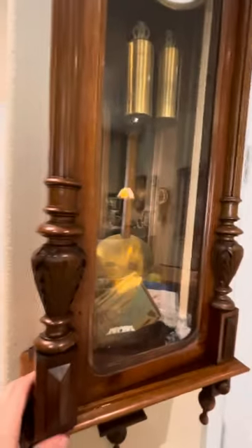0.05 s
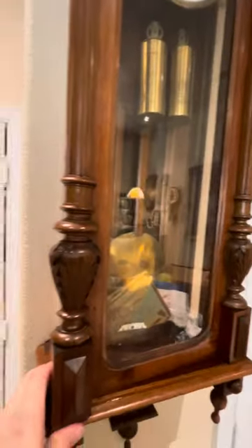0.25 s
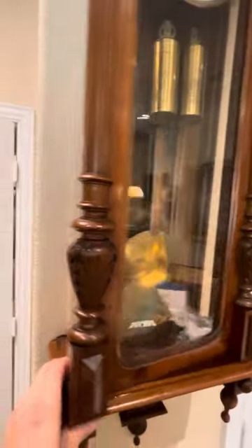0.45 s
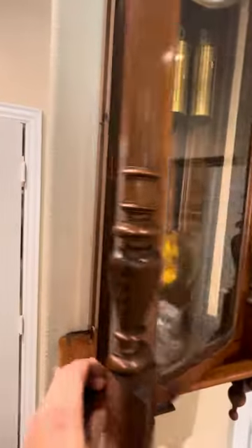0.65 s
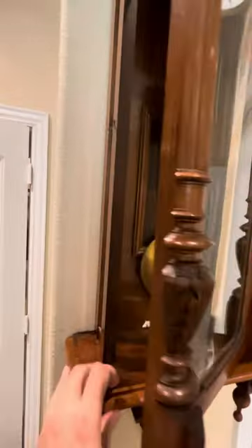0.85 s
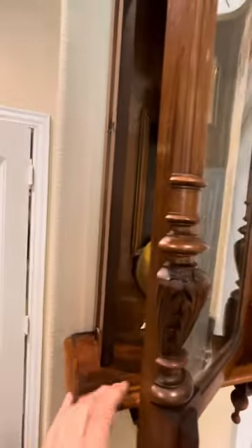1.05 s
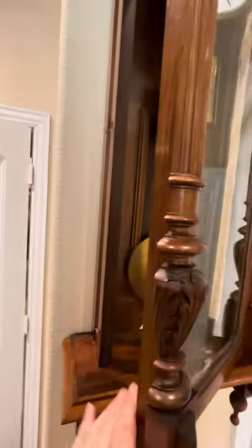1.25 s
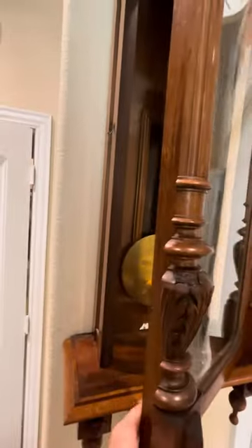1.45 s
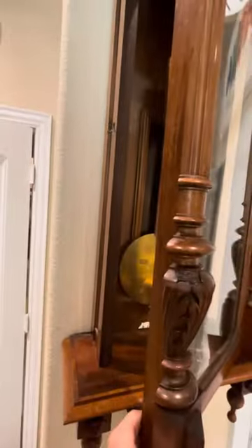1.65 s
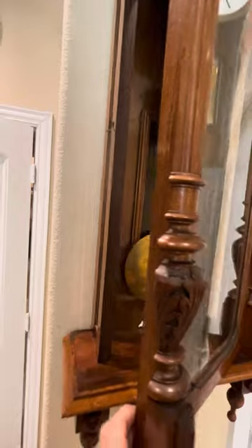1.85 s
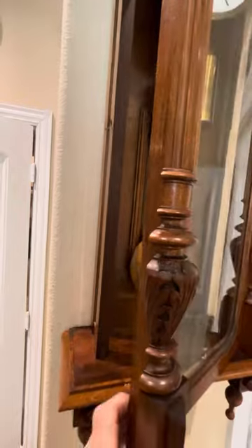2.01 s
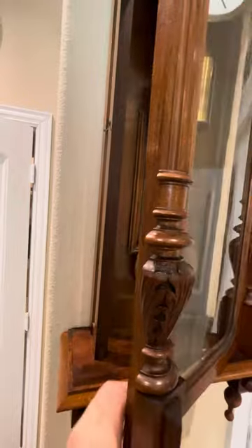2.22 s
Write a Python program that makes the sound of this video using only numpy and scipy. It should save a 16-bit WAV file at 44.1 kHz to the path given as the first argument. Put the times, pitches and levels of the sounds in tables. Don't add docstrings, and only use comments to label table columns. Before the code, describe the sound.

A wooden clock door being unlatched, heard close in stereo in a small quiet room. Faint tick near 0.1 s, a crisp latch click at 0.23, then the loudest, bright cracking snap at 0.41 with hollow wood knocks and skin rubbing until 0.7. A lull with faint ticks; lighter snap at 1.13, strong snap at 1.39, soft knock at 1.67, clustered low knocks around 1.9-2.0, light snap at 2.24.

```python
import sys
import numpy as np
from scipy import signal
from scipy.fft import rfft, irfft, next_fast_len
from scipy.io import wavfile
from scipy.ndimage import uniform_filter1d

SR = 44100
rng = np.random.default_rng(int(sys.argv[2]) if len(sys.argv) > 2 else 0)


def volts(x):
    e = np.asarray(x, float) / 20
    return 10 ** e


def master_out(mix):
    frames = np.transpose(np.atleast_2d(mix))
    ceiling = np.clip(frames, -1, 1)
    pcm = np.round(ceiling * 32767).astype(np.int16)
    wavfile.write(sys.argv[1], SR, pcm)


N = 99225

# frequency in Hz, level in dB.
AIR_COLOUR = [(25, 7), (90, 5.5), (250, -21), (600, -29.5), (2000, -26), (5300, -31), (11000, -36.5),
              (14000, -55.5)]
AIR_DB = -61.5

# frequency in Hz, t60 in seconds.
ROOM_T60 = [(150, 0.39), (1000, 0.3), (5000, 0.37), (12000, 0.29)]
# frequency in Hz, level in dB.
ROOM_COLOUR = [(150, 4), (1000, 9.5), (3000, 0), (6000, 3), (12000, -7.5)]
ROOM_GAP_S = 0.00043
ROOM_SNAP_DB, ROOM_TICK_DB, ROOM_KNOCK_DB, ROOM_RUB_DB = -4.5, -12, -10, -8
# frequency in Hz, correlation from 0 to 1.
LIKENESS = [(60, 1), (300, 0.26), (800, 0.54), (4000, 0.033), (6000, 0.15), (8000, 0.34), (12000, 1)]

# start in seconds, length in seconds, level in dB,
# tilt in dB per octave, fade in dB per second.
RUBS = [(0, 0.071, -71, 1.5, 54), (0.205, 0.078, -72, -2, -100), (0.376, 0.14, -49.5, 0, -4),
        (0.504, 0.17, -50.5, -4, 5), (0.694, 0.097, -54.5, -3.5, -7), (0.779, 0.061, -51.5, -4.5, 17),
        (0.095, 0.07, -80, -4.5, -3), (0.99, 0.081, -64, 0.5, 28), (1.083, 0.055, -68.5, -7, -11),
        (1.298, 0.085, -64, -2.5, -32), (1.577, 0.088, -61, 2.5, 47), (1.834, 0.11, -62, 1, -43.5),
        (1.912, 0.041, -41.5, -2, -9), (1.968, 0.16, -54.5, -5.5, 42), (2.154, 0.083, -67.5, -8, 41),
        (2.194, 0.047, -73.5, 3.5, -3)]
# frequency in Hz, density in dB per Hz.
RUB_COLOUR = [(300, -5), (800, 1.5), (1500, 2), (2800, 0), (5500, -0.26), (7500, -1), (11000, 3),
              (13500, -25)]
RUB_RISE_S, RUB_FALL_S, RUB_GRAINS_PER_S = 0.0027, 0.0033, 6000

# frequency in Hz, level in dB, t60 in seconds.
CASE_MODES = [(69.44, -15.5, 0.28), (102, -7.5, 0.13), (140, -1, 0.09), (197.4, -4.5, .08),
              (231, -2.5, 0.084), (290, 0, 0.049), (390.6, -5.5, 0.056), (754, -2.5, 0.039),
              (880, 9, 0.019), (1104, -11, 0.083), (1446, 0.5, 0.026), (2700, -15.5, 0.11)]
# time in seconds, level in dB.
SHUDDER = [(0.0, -110), (0.31, -44), (0.38, -55.5), (0.41, -33), (1.06, -62.5), (1.16, -40), (1.37, -79),
           (1.4, -41), (1.62, -105), (1.67, -56), (1.87, -65.5), (1.92, -32.5), (2.13, -57), (2.25, -53)]
SHUDDER_PER_S, SHUDDER_DB, SHUDDER_SOFT_HZ = 130, -8, 358

# time in seconds, peak in dB, favoured pitch in Hz, ring share of t60.
KNOCKS = [(0.23, -45, 282, 3.9), (.25, -40.5, 90, 1.3), (0.312, -43, 78.7, 1.1), (.409, -24, 290, 2.1),
          (0.441, -51, 111, 2.8), (.49, -27.5, 171, 1.3), (0.591, -29.5, 202, 1.3),
          (0.629, -33.5, 166.6, 1.6), (1.091, -57.5, 383, 0.92), (1.127, -59, 190, 1.2),
          (1.392, -38, 880, 1.1), (1.667, -36, 200, 0.43), (1.899, -39, 400, 1.9), (1.941, -37, 2700, 0.5),
          (.425, -37, 390, 0.76), (.27, -45.5, 400, 1.7), (.65, -40, 232, 0.58), (1.974, -29, 140, 0.75),
          (1.15, -40, 880, 1.4), (1.01, -48.5, 188, 1.5), (1.913, -22, 276, 0.42), (1.927, -21.5, 221, 0.4),
          (1.961, -27.5, 140, 0.51), (2.178, -40, 220, 0.46), (2.24, -38.5, 154, 0.95)]
KNOCK_FALL_DB = 16.5
CONTACT_CYCLES = 0.46

# time in seconds, peak in dB.
TICKS = [(.0775, -50), (.7126, -48), (1.3424, -41.5), (1.897, -37), (2.164, -40.5), (1.1148, -41.5),
         (1.278, -47), (1.5958, -40.5), (1.377, -63.5), (1.384, -39), (1.3915, -17.5), (1.911, -31),
         (1.9295, -23.5), (.787, -41), (.8225, -56.5), (.9966, -73), (.2263, -24.5), (0.42, -44.5),
         (1.1287, -32), (1.393, -27.5), (1.9495, -38)]
TICK_KINDS = [0, 0, 1, 2, 2, 3, 3, 3, 4, 4, 4, 5, 5, 5, 3, 1, 6, 6, 4, 7, 3]
# frequency in Hz, level in dB, t60 in seconds.
TICK_MODES = [
    [(1720, -3, 0.025), (1960, 0, .02), (2960, -4, .025), (5400, -8, 0.015)],
    [(1340, -2, 0.045), (2660, 0, 0.045), (3780, -12, 0.04), (5440, -5, 0.05)],
    [(800, -5, 0.02), (1300, 0, 0.02), (1800, -6, 0.015), (3200, -14, 0.02)],
    [(2300, -2, .005), (3500, 0, .005), (4800, -1, .004), (6500, -8, .004)],
    [(780, -8, .02), (2200, -4, .015), (3200, -2, .015), (5430, 0, .025)],
    [(720, -3, .03), (1450, -1, .035), (2750, 0, .035), (3500, -8, .025)],
    [(1700, 0, .01), (2900, -8, .008), (4050, 0, .007), (5800, -8, .006)],
    [(690, -2, .03), (820, -5, .02), (1080, 0, .03), (2100, -3, .02)],
]
TICK_SCRAPE_S = [.06, 0.045, 0.016, 0.00313, 0.024, 0.023, 0.007, .015]
TICK_HIT_DB = [17, 13.6, 10, 8.3, 13, 7.4, 7.7, 10.3]

# time in seconds, peak in dB, tilt in dB per octave,
# crack t60 in seconds, wood share in dB.
SNAPS = [(0.2272, -15, 3.5, 0.013, -20), (0.3789, -35.5, -6, 0.005, -22), (0.4077, 0.5, 5, 0.014, -20.5),
         (0.6385, -34.5, 6.5, 0.026, -10), (1.11, -54, 17, 0.011, -22), (1.1293, -19.5, 0.5, 0.01, -15),
         (1.298, -50, 3, 0.014, -13), (1.3915, -10.5, 2.5, 0.033, -18), (1.584, -45, 7.5, 0.012, -20.5),
         (1.9125, -41, 2, 0.01, 3), (2.2434, -36, 1.5, 0.028, -14)]
# frequency in Hz, density in dB per Hz.
SNAP_COLOUR = [(500, -24), (1500, 8.5), (2500, 7), (4000, -2), (5800, 1.1), (8500, -2), (11000, 6.5),
               (14500, -14.5)]

RIPPLE_S, RIPPLE_DB, RIPPLE_LOW_HZ, RIPPLE_HZ = .0006, -5.5, 250, 4500

# frequency in Hz, lag of the right in radians.
PORT_PHASE = [(200, 0), (400, .6), (700, 3.3), (3000, 3.3), (3900, 6.3), (5500, 6.1), (8000, 9),
              (9800, 9.6), (11800, 12.57)]
BALANCE_DB = .2
ALIKE_ABOVE_HZ = 8000
MIC_LOW_HZ, CUTOFF_HZ = 49, 10840
TOP = .85


def in_time(rows):
    return np.interp(np.arange(N) / SR, *np.transpose(rows))


def at_hz(points, hz):
    freqs, values = np.transpose(points)
    return np.interp(np.log(hz), np.log(freqs), values)


def rms_one(x):
    return x / np.sqrt(np.mean(x ** 2) + 1e-20)


def low(x, hz):
    return signal.sosfilt(signal.butter(2, min(hz, 19000), fs=SR, output="sos"), x)


def ring(x, hz, t60):
    r = volts(-60 / (max(t60, 1e-3) * SR))
    w = 2 * np.pi * hz / SR
    return signal.lfilter([0, np.sin(w)], [1, -2 * r * np.cos(w), r * r], x + 1e-18)


def add(out, s, x):
    i = int(s * SR)
    out[i:i + len(x)] += x[:len(out) - i]


def drift(rate):
    knots = rng.standard_normal(int(N / SR * rate) + 3)
    path = np.interp(np.arange(N) / SR * rate, np.arange(len(knots)), knots)
    return low(path, 2 * rate) * 3.53


def grains(per_s, spread_db, shape):
    sizes = volts(spread_db * np.minimum(rng.exponential(1, shape), 4))
    sizes = sizes * rng.choice([-1, 1], shape)
    return sizes * (rng.random(shape) < per_s / SR)


def bands(white, gain):
    out = 0
    edges = 25 * 2 ** np.arange(0, 9.6, .5)
    for k, (a, b) in enumerate(zip(edges, edges[1:])):
        band_pass = signal.butter(2, [a, b], "band", fs=SR, output="sos")
        mid, side = signal.sosfilt(band_pass, white[k % 2])
        hz = np.sqrt(a * b)
        alike = np.clip(at_hz(LIKENESS, hz), -1, 1)
        pair = np.sqrt(1 + alike) * mid + np.sqrt(1 - alike) * side * [[1], [-1]]
        out = out + gain(hz) * pair
    return out


def air():
    def gain(hz):
        return volts(at_hz(AIR_COLOUR, hz) + 0.93 * drift(13.0))
    return volts(AIR_DB) * rms_one(bands(rng.standard_normal((2, 2, N)), gain))


def room(x):
    t = np.arange(SR // 2 * 2) / SR

    def gain(hz):
        return volts(at_hz(ROOM_COLOUR, hz) - 60 * t / at_hz(ROOM_T60, hz))
    tail = bands(rng.standard_normal((2, 2, len(t))), gain)
    energy = np.sum(tail ** 2, axis=1, keepdims=True)
    tail = tail * np.clip(t / ROOM_GAP_S - .5, 0, 1) / np.sqrt(energy)
    return signal.fftconvolve(x[None], tail, axes=1)[:, :N]


def rub():
    t = np.arange(N) / SR
    together = drift(25)
    strokes = []
    for s, length, db, _, fade_db in RUBS:
        level = volts(db - fade_db * np.clip(t - s, 0, length))
        rise = np.clip((t - s) / RUB_RISE_S, 0, 1)
        fall = np.exp(-np.maximum(t - s - length, 0) / RUB_FALL_S)
        strokes.append(level * rise * fall)
    tilts = np.array(RUBS)[:, 3]

    def gain(hz):
        patchy = volts(at_hz(RUB_COLOUR, hz) + 0.5 * together + 0.91 * drift(60))
        return patchy * (volts(tilts * np.log2(hz / 3000)) @ strokes)
    return bands(rms_one(grains(RUB_GRAINS_PER_S, 5.06, (2, 2, N))), gain)


def shudder():
    jolts = low(grains(SHUDDER_PER_S, 2.8, N), SHUDDER_SOFT_HZ)
    x = sum((-1) ** k * volts(level_db) * ring(jolts, hz, 0.73 * t60)
            for k, (hz, level_db, t60) in enumerate(CASE_MODES))
    return volts(in_time(SHUDDER) + SHUDDER_DB) * rms_one(x)


def knocks():
    out = np.zeros(N)
    luck = rng.normal(0, 1, (len(KNOCKS), 2, len(CASE_MODES)))
    for (s, db, top_hz, share), (own, sign) in zip(KNOCKS, luck):
        push = np.pad(np.hanning(int(CONTACT_CYCLES * SR / top_hz)), (0, 20000))
        x = 0
        for (hz, level_db, t60), o, p in zip(CASE_MODES, own, sign):
            mode_db = level_db + 3.9 * o - KNOCK_FALL_DB * abs(np.log2(hz / top_hz))
            x = x + np.sign(p) * volts(mode_db) * ring(push, hz, share * t60)
        add(out, s - .001, volts(db) * x / np.abs(x).max())
    return out


def ticks():
    out, t = np.zeros(N), np.arange(8000) / SR
    noise = rng.standard_normal((len(TICKS), len(t)))
    for (s, db), kind, n in zip(TICKS, TICK_KINDS, noise):
        slide = n * volts(-60 * t / max(TICK_SCRAPE_S[kind], .001))
        force = slide + volts(TICK_HIT_DB[kind]) * (t == 0)
        x = sum((-1) ** k * volts(level_db) * ring(force, hz, t60)
                for k, (hz, level_db, t60) in enumerate(TICK_MODES[kind]))
        add(out, s, volts(db) * x / np.abs(x).max())
    return out


def snaps():
    out, t = np.zeros(N), np.arange(4096) / SR
    hz = np.fft.rfftfreq(len(t), 1 / SR) + 1
    noise = rng.standard_normal((len(SNAPS), len(t)))
    for (s, db, tilt_db, t60, wood_db), n in zip(SNAPS, noise):
        force = n * (np.clip((t - .002) / 0.0011, 0, 1) * volts(-60 * t / max(t60, .002)))
        burst = rfft(force)
        burst = burst / uniform_filter1d(np.abs(burst), size=25)
        colour_db = at_hz(SNAP_COLOUR, hz) + tilt_db * np.log2(np.maximum(hz, 400) / 5000)
        crack = irfft(burst * volts(colour_db))
        crack = crack * np.clip(t / 0.0031, 0, 1) ** 2 * volts(-60 * t / 0.088)
        wood = sum(volts(level_db) * ring(force, mode_hz, .5 * mode_t60)
                   for mode_hz, level_db, mode_t60 in CASE_MODES[7:])
        x = crack / np.abs(crack).max() + volts(wood_db) * wood / np.abs(wood).max()
        add(out, s - .003, volts(db) * x)
    return out


def scene():
    floor, slide = air(), rub()
    dull = shudder() + knocks()
    tick, snap = ticks(), snaps()
    wet = room(volts(ROOM_SNAP_DB) * snap + volts(ROOM_TICK_DB) * tick
               + volts(ROOM_KNOCK_DB) * dull + volts(ROOM_RUB_DB) * slide[0])
    delayed = np.pad(snap + tick, (int(RIPPLE_S * SR), 0))[:N]
    ripple = volts(RIPPLE_DB) * low(delayed, RIPPLE_HZ)
    ripple = ripple - low(ripple, RIPPLE_LOW_HZ)
    direct = (snap + tick + dull) * volts(np.array([[BALANCE_DB], [-BALANCE_DB]]))
    return direct + ripple * [[1], [-1]] + wet + slide + floor


def top_cut(x):
    return signal.sosfilt(signal.butter(12, 16340, fs=SR, output="sos"), x)


def record(dry):
    size = next_fast_len(N + 4096)
    hz = np.fft.rfftfreq(size, 1 / SR)
    mid = rfft(dry[0] + dry[1], size) / 2
    side = rfft(dry[0] - dry[1], size) / 2 / (1 + (hz / ALIKE_ABOVE_HZ) ** 20)
    turn = np.exp(-1j * np.interp(hz, *np.transpose(PORT_PHASE)))
    x = irfft(np.stack([mid + side, (mid - side) * turn]), size)[:, :N]
    x = TOP * np.tanh(x / TOP)
    x = signal.sosfilt(signal.butter(4, MIC_LOW_HZ, "high", fs=SR, output="sos"), x)
    x = signal.sosfilt(signal.butter(6, CUTOFF_HZ, fs=SR, output="sos"), x)
    return top_cut(x)


dry = scene()
out = record(dry)
master_out(out)
```